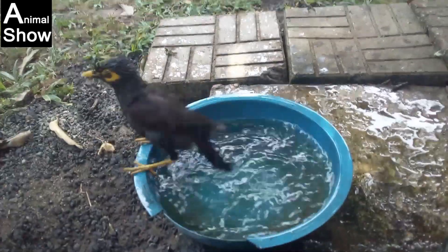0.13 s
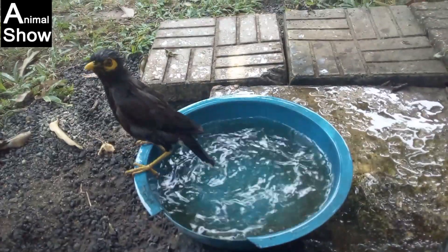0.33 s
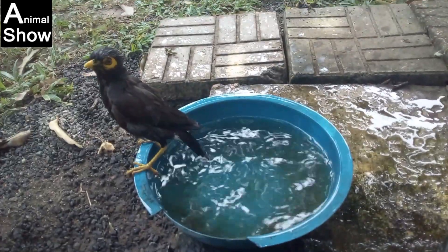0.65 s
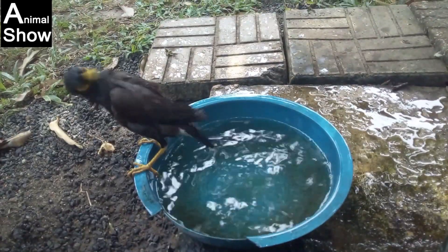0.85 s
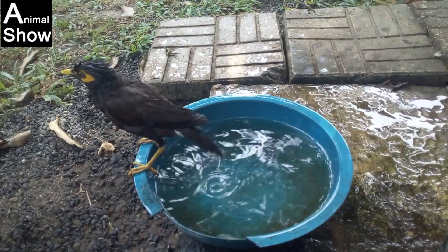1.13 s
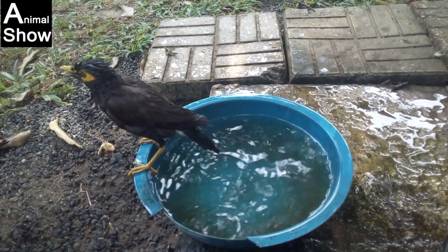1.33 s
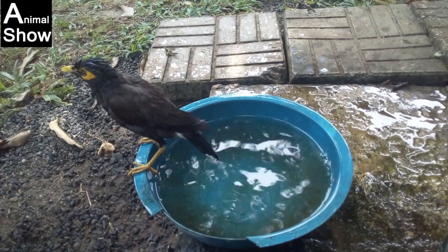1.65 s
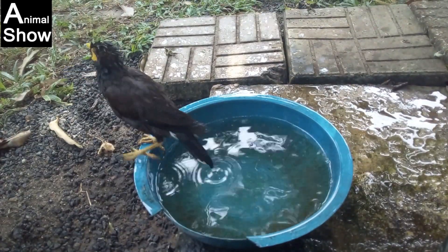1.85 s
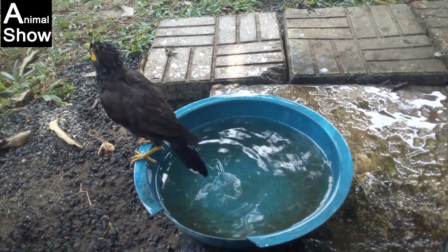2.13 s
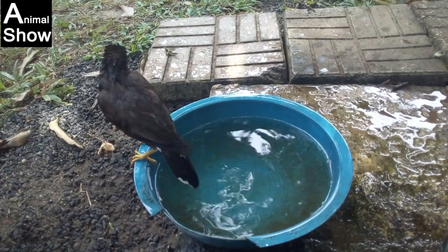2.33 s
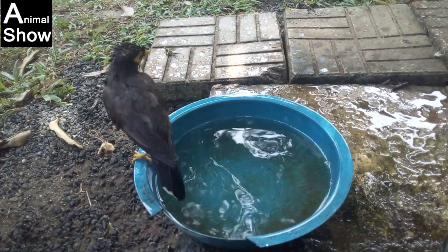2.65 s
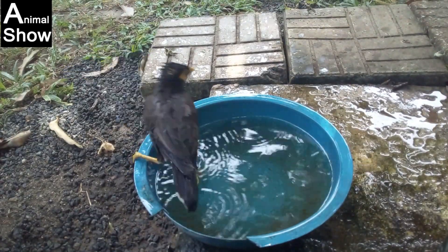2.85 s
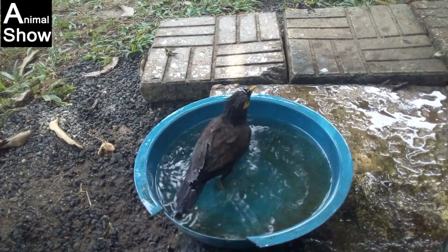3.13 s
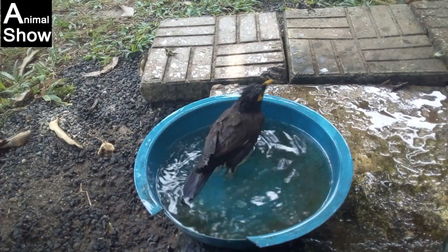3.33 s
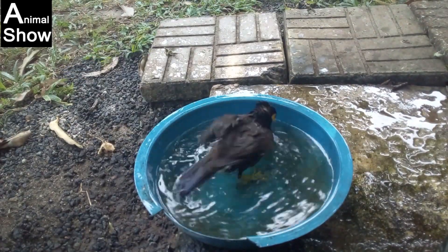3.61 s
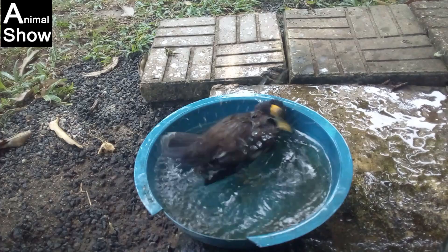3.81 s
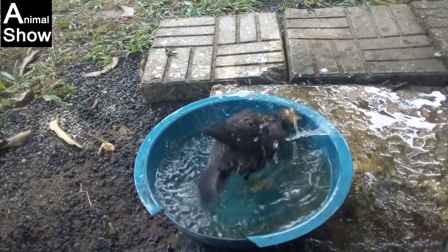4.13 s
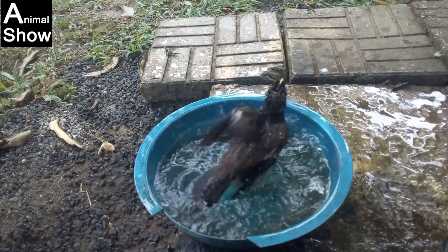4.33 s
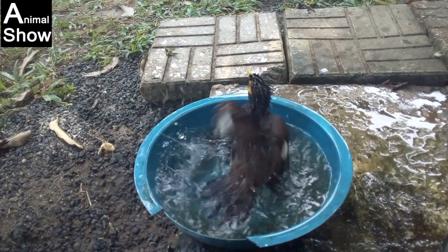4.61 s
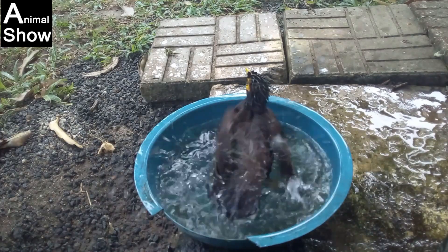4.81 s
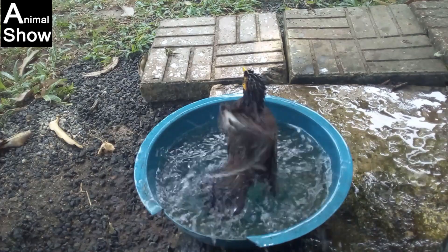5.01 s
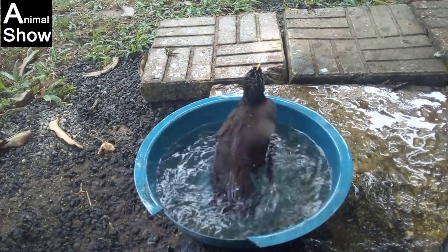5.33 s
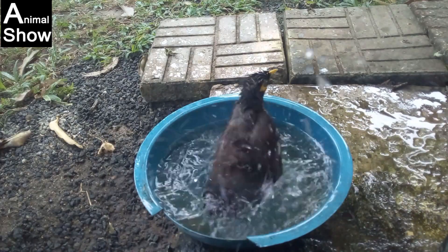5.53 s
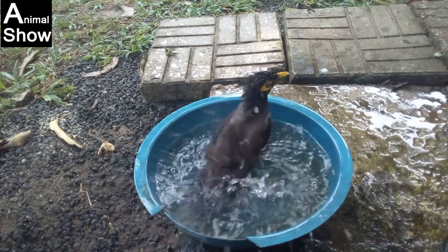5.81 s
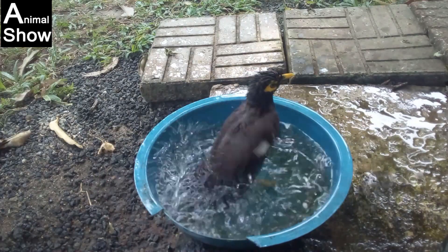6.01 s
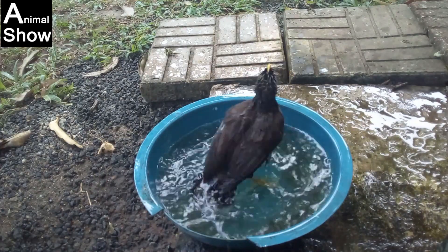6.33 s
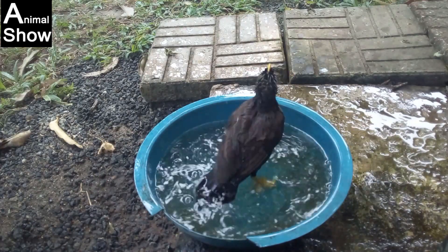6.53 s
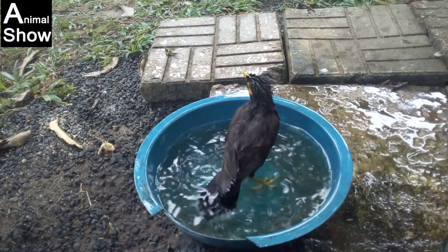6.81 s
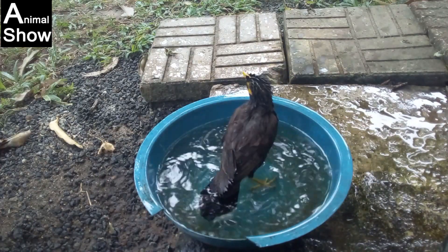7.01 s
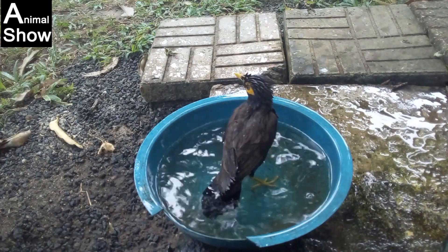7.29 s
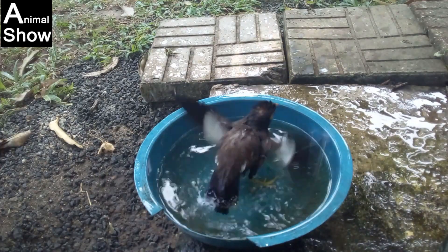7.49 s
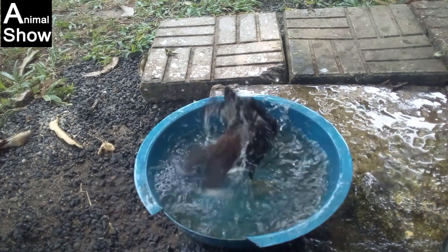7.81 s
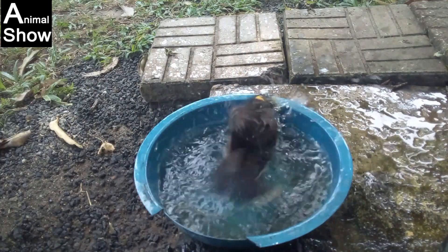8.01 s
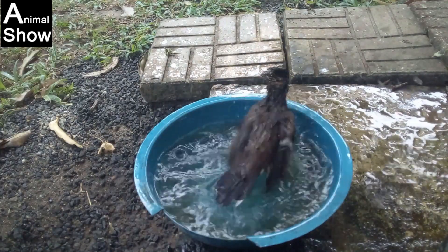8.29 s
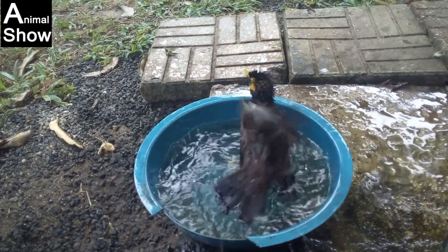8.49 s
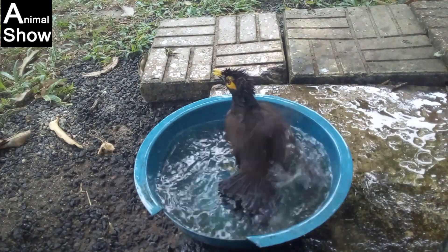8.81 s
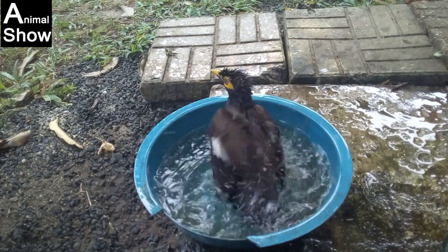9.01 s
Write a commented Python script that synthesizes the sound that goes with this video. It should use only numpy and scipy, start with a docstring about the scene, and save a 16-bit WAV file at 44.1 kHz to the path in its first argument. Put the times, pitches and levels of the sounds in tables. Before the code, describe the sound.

Outdoors in a quiet garden, heard close: a mynah-like bird gives one harsh squawk beside a basin of settling water. Near-silence, then little drips and foot plops, and a dull plastic tap. Wings beat the water about thirteen times a second, crisp and splashy, with popping bubbles. A pause holds a faint distant bird whistle, then sharp basin knocks and another whirring run of slaps that lasts to the end.

```python
"""A bird squawks on the rim of a plastic basin, hops in and beats its wings in the water, thirteen times a second.
Slaps are shaped noise bursts with a crack at the peak; some blows ring the basin wall as decaying modes.
Stirred water is a shower of short plinks over a wash; drops are ticks, bubbles are sines that climb in pitch.
The squawk sums wavering partials and rasping air; a small bird far off whistles falling notes.
Filtered noise makes far traffic, hiss and insects; sparse echoes surround the basin and both birds."""
import sys
import numpy as np
from scipy import signal
from scipy.fft import rfft, irfft
from scipy.io import wavfile
from scipy.ndimage import uniform_filter1d

SR = 44100
rng = np.random.default_rng(int(sys.argv[2]) if len(sys.argv) > 2 else 0)


def generate_wav(sig):
    """Save sig (samples, or channels by samples) to the path in sys.argv[1] as 16-bit PCM at SR."""
    pcm = np.round(np.clip(np.atleast_2d(sig).T, -1, 1) * 32767).astype(np.int16)
    wavfile.write(sys.argv[1], SR, pcm)


N = 403515

# Wing and foot slaps, before band gains. Each row: centre in seconds, crackle level in dB,
# low body in dB over the crackle, spray in dB over the crackle.
SLAPS = [(2.876, -57.5, 12.5, -13), (3.04, -58.5, 9.5, -10), (3.105, -46, 3.5, 4.5), (3.2424, -40, 0, 2.5),
         (4.2642, -43.5, -2, 7.5), (4.4512, -40.5, -9, -15), (4.5172, -40, 2, -19), (4.605, -32.5, -8, -15),
         (4.6807, -28, -6, -7), (4.7565, -29, -4, -8), (4.8315, -27.5, -2.5, -0.5),
         (4.908, -29.5, -9, -7.5), (4.9803, -30.5, -1.5, -3), (5.0576, -28, -9, 5.5),
         (5.1396, -31.5, -4.5, -2.5), (5.2155, -31, -11, -4.5), (5.2939, -28.5, -1, -6),
         (5.3832, -33.5, -4, -10.5), (5.4706, -28.5, -5.5, -7.5), (5.5416, -22, -12.5, -8.5),
         (5.6155, -22.5, -9, -10), (5.6878, -24, -8.5, -10), (5.7637, -22.5, -13.5, -9.5),
         (5.839, -24, -14, -4.5), (5.9171, -25, -10.5, -11), (5.9965, -28, -5, -7),
         (6.0796, -30, -1.5, -7.5), (6.1762, -40, -5, -3), (6.2758, -39, -4, -1.5), (7.7746, -45, -16, -21),
         (7.9458, -36.5, -8.5, -8), (8.0485, -34.5, 14, -0.5), (8.097, -37, -21, 7.5),
         (8.1445, -43, -14, -8), (8.2543, -48.5, 7.5, 4), (8.2935, -44, -2, 6.5), (8.3628, -47, 5, 3),
         (8.4562, -42, 1.5, -9), (8.5289, -32.5, -3, -4.5), (8.6054, -28, -3, -7.5),
         (8.682, -25.5, -8.5, -8), (8.7607, -27.5, -1, -9), (8.7886, -50.5, 13.5, -12),
         (8.839, -28, 1.5, -11.5), (8.9213, -29, -4.5, -14.5), (9.0028, -27.5, -2.5, -2),
         (9.081, -27, -7.5, -10.5)]
# Stirred water, one list per bout of movement. Each row: time in seconds, level in dB.
CHURN = [
    [(0, -49.5), (.17, -50), (.32, -53)],
    [(2.78, -58), (2.88, -58), (2.95, -64), (3.05, -58), (3.18, -62), (3.28, -48)],
    [(3.85, -55), (4.1, -54.5), (4.6, -54), (4.9, -50), (5.35, -57), (5.75, -51), (6.1, -51.5), (6.55, -66)],
    [(7.64, -59.5), (7.82, -54.5), (8.9, -53), (9.15, -55.5)],
]


def gain_of(db):
    """Decibels to amplitude."""
    return 10 ** (np.asarray(db) / 20)


def evened(x):
    """Scales to rms 1."""
    return x / np.sqrt(np.mean(x ** 2) + 1e-20)


def add(mix, start_s, sound):
    """Lays a sound into the mix at start_s, cut at the end of the mix."""
    part = mix[round(start_s * SR):][:len(sound)]
    part += sound[:len(part)]


def band(x, lo_hz, hi_hz, order=2):
    """Causal Butterworth band-pass."""
    edges_hz = [lo_hz, min(hi_hz, .45 * SR)]
    return signal.sosfilt(signal.butter(order, edges_hz, "band", fs=SR, output="sos"), x)


def coloured(x, points):
    """Filters x by a response given as (Hz, dB) points, joined on a log-frequency axis."""
    point_hz, point_db = np.transpose(points)
    hz = np.fft.rfftfreq(len(x), 1 / SR)
    response_db = np.interp(np.log(hz + 1), np.log(point_hz), point_db)
    return irfft(rfft(x) * gain_of(response_db), len(x))


def drift(count, size):
    """Smooth chance of rms 1 that changes over size samples."""
    once = uniform_filter1d(rng.standard_normal(count), size)
    return evened(uniform_filter1d(once, size))


def sampled(rows):
    """Start time and the columns of a curve, sample by sample."""
    row_s, *columns = np.transpose(rows)
    t = np.arange(row_s[0], row_s[-1], 1 / SR)
    return row_s[0], [np.interp(t, row_s, column) for column in columns]


def tone(hz, rough, partials):
    """Partials on a wavering pitch with a fluttering level."""
    turns = np.cumsum(hz * (1 + 0.051 * rough * drift(len(hz), size=90))) / SR
    flutter = gain_of(7.3 * rough * drift(len(hz), size=120))
    waves = sum(gain_of(db) * np.sin(2 * np.pi * multiple * turns) for multiple, db in partials)
    return flutter * np.sqrt(2) * waves


def garden(hiss_db=-55):
    """Noise bands: traffic rumble that swells, steady hiss, insects and a faint distant drone."""
    # Spectrum. Each row: frequency in Hz, relative density in dB per Hz.
    spectrum = [(20, -30), (36, -5.5), (62, 5.5), (100, 2), (150, -1.5), (300, -9.5), (500, -17),
                (1200, -22), (3000, -27), (4900, -30.5), (8600, -39), (15300, -37), (16000, -38)]
    # Traffic swell, before a 3 dB lift. Each row: time in seconds, level in dB.
    swell = [(0.0, -46.5), (0.46, -57), (6.04, -52.5), (6.88, -56.5), (8.97, -54), (9.15, -54.5)]
    # Insect bands. Each row: centre in Hz, width in Hz, mean level in dB.
    insect_bands = [(5680, 230, -67.5), (6030, 140, -73), (6570, 200, -71), (7000, 280, -74),
                    (6400, 2700, -67)]
    # Distant band: centre in Hz, width in Hz, mean level in dB.
    drone = (780, 150, -71)
    noise = coloured(rng.standard_normal(N), spectrum)
    swell_s, swell_db = np.transpose(swell)
    rumble_db = np.interp(np.arange(N) / SR, swell_s, swell_db) + 3.0
    rumble = gain_of(rumble_db) * evened(band(noise, 18, 265))
    hiss = gain_of(hiss_db + .5 * drift(N, size=4000)) * evened(band(noise, 203, 13100))
    insects = np.zeros(N)
    for hz, width_hz, db in insect_bands + [drone]:
        buzz = evened(band(rng.standard_normal(N), hz - width_hz / 2, hz + width_hz / 2))
        insects += gain_of(db + 1.3 * drift(N, size=300)) * buzz
    return rumble + hiss + insects


def squawk(rough=.33, rasp_db=-10):
    """Two membranes sound in the first note, with sum and difference tones; air rasps past them."""
    # Main voice, one list per note. Each row: time in seconds, pitch in Hz, level in dB.
    notes = [
        [(0, 1820, -36.5), (.02, 1902, -49), (.045, 2140, -44), (.07, 2317, -32.5), (.092, 2146, -37),
         (.106, 2040, -38), (.13, 2030, -46)],
        [(.13, 1520, -41), (.152, 1686, -33), (.172, 1700, -33.5), (.183, 1640, -37), (.198, 1850, -36),
         (.225, 1903, -41.5), (.25, 2070, -50), (.28, 1940, -60)],
    ]
    # Each row: multiple of the pitch, relative level in dB.
    overtones = [(1, 0), (2, -7), (3, -11), (4, -15)]
    # Second membrane. Each row: time in seconds, pitch in Hz, level in dB before partial gains.
    second_voice = [(.045, 1133, -68), (.068, 1316, -48), (.095, 1246, -53), (.125, 1260, -57)]
    main, second = np.zeros((2, N))
    start_s, (hz, db) = sampled(second_voice)
    add(second, start_s, gain_of(db) * tone(hz, 0.27, [(1, 2.6), (2, 5.7)]))
    for rows in notes:
        start_s, (hz, db) = sampled(rows)
        voice = tone(hz, rough, overtones)
        air = evened(band(rng.standard_normal(len(hz)), 1200, 7500))
        rasp = gain_of(rasp_db) * air * gain_of(4 * drift(len(hz), size=150))
        add(main, start_s, gain_of(db) * (voice + rasp) * signal.windows.tukey(len(hz), .1))
    combination = gain_of(30) * main * second
    return band(main + second + combination, 480, 6600, order=3)  # the beak passes little above this


def stirred():
    """Level of the moving water, sample by sample."""
    level = np.zeros(N)
    for rows in CHURN:
        start_s, (db,) = sampled(rows)
        add(level, start_s, gain_of(db) * signal.windows.tukey(len(db), .06))
    return level


def bubble(db, hz, t60_s, rise=9.5):
    """A pocket of air rings and climbs in pitch as it nears the surface."""
    t = np.arange(SR // 25) / SR
    decay = gain_of(db - 60 * t / max(t60_s, .005))
    onset = 1 - np.exp(-t / 0.0004)
    return decay * onset * np.sin(2 * np.pi * hz * (t + rise * t ** 2))


def gurgle(per_s=90):
    """Small bubbles of chance pitch burst now and then in the stirred water."""
    out = np.zeros(N)
    for when, pitch, size in rng.random((round(per_s * N / SR), 3)):
        add(out, when * N / SR, bubble(14 * size, 1000 * 4.5 ** pitch ** 1.5, 0.022))
    return evened(out)


def churn(per_s=1700.0, spread_db=2.5, clump_db=3.5, wash_db=-9, gurgle_db=-10.5):
    """Falling droplets of many pitches, in clumps, over a patchy wash with gurgling bubbles."""
    # Water spectrum. Each row: frequency in Hz, relative density in dB per Hz.
    fizz = [(180, 7), (300, 12.5), (1770, -0.5), (5930, -6.5), (8870, -12.5), (13500, -11.5), (15700, -10),
            (16500, -49)]
    size = gain_of(spread_db * np.minimum(rng.exponential(1, N), 4))
    hits = size * (rng.random(N) < per_s / SR)
    kind, fall = rng.integers(0, 24, N), np.zeros(N)
    for k, hz in enumerate(np.geomspace(900, 15000, 24)):
        u = np.arange(0, 14, hz / SR)  # time in cycles
        # low drops trap air and ring longer
        cycles = np.clip(rng.uniform(0.39, 0.4) * (2600 / hz) ** 0.27, .35, 2.2)
        plink = u * np.exp(-u / cycles) * np.sin(2 * np.pi * (u + 0.047 * u ** 2))
        fall += signal.oaconvolve(hits * (kind == k), plink / np.linalg.norm(plink))[:N]
    white = coloured(fall, [(500, -10), (14000, 14.0)])  # log-spread pitches crowd the low end
    wash = gain_of(wash_db) * rng.standard_normal(N)
    water = coloured(evened(white) + wash, fizz)
    slop = band(water, 170, 7300)  # heavy water and fine spray clump apart
    heavy = gain_of(clump_db * drift(N, size=900)) * slop
    fine = gain_of(clump_db * drift(N, size=600)) * (water - slop)
    return stirred() * (evened(heavy + fine) + gain_of(gurgle_db) * gurgle())


def wing_tips(lead_s=.011, scatter_s=.002, over_slap_db=-8, centre_hz=4300, from_db=-36, until_s=8.65):
    """The wing tip ticks just before each full beat, until the bird stands tall."""
    late, size, pitch = rng.standard_normal((len(SLAPS), 3)).T
    slap_s, slap_db = np.transpose(SLAPS)[:2]
    tick_s = slap_s - lead_s + scatter_s * late
    tick_db = slap_db + over_slap_db + 3 * size
    full_beat = (slap_db > from_db) & (slap_s < until_s)
    return np.c_[tick_s, tick_db, centre_hz * 1.35 ** pitch][full_beat]


def drips(per_s=16, over_water_db=7.5, spread_db=4):
    """Chance drops whose level follows the stirred water, from the second bout on."""
    when, size, pitch = rng.random((round(per_s * N / SR), 3)).T
    water_db = 20 * np.log10(stirred()[(when * N).astype(int)] + 1e-9)
    drip_db = water_db + over_water_db - spread_db * np.log(size + .02)
    rows = np.c_[when * N / SR, drip_db, 2500 * 3.6 ** pitch]
    return rows[rows[:, 0] > CHURN[1][0][0]]


def drops(t60_s=0.013):
    """Each drop, wing-tip tick or drip is a decaying noise tick, wide around its own centre."""
    # Clearest drops and ticks. Each row: time in seconds, level in dB before a 6 dB lift, centre in Hz.
    clear_drops = [(0.055, -54, 11000), (0.225, -32.5, 3860), (0.2518, -40, 1980), (0.2847, -36.5, 5640),
                   (1.0356, -47, 4110), (2.8139, -42.5, 3280), (2.829, -40, 2910), (2.8373, -40, 4100),
                   (2.8556, -43, 2900), (2.976, -45.5, 2000), (3.0268, -46, 1670), (3.0613, -46.5, 1820),
                   (3.116, -37.5, 2680), (3.149, -46, 3390), (3.1973, -45, 4150), (3.2153, -35, 2520),
                   (3.2231, -33, 3540), (3.3477, -43, 2820), (3.4339, -43.5, 2730), (3.444, -40.5, 4430),
                   (3.587, -47, 4030), (3.9823, -37.5, 2850), (4.0551, -45, 3160), (4.132, -45, 1800),
                   (4.167, -40, 3320), (4.239, -38, 4600), (4.28, -41, 7220), (4.353, -41.5, 5940),
                   (4.4277, -42, 7530), (4.5274, -33, 8520), (4.6893, -43, 2150), (5.222, -37, 3210),
                   (5.392, -34.5, 5560), (5.9092, -23.5, 4370), (6.24, -41, 3140), (6.5793, -45, 5100),
                   (7.677, -43, 8560), (7.799, -35, 5960), (7.9238, -38.5, 6000), (7.9333, -40, 4280),
                   (8.1346, -38.5, 4680), (8.2692, -40, 2920), (8.328, -39, 3510), (8.3349, -36, 2680),
                   (8.3825, -42.5, 4170), (8.467, -35, 5100), (8.5912, -33, 5490), (8.6137, -36, 5090),
                   (9.009, -34, 3500)]
    out, t = np.zeros(N), np.arange(SR // 50) / SR
    for tick_s, db, hz in np.r_[clear_drops, wing_tips(), drips()]:
        tick = band(rng.standard_normal(len(t)) * gain_of(-60 * t / t60_s), hz / 2.46, hz * 1.47)
        add(out, max(tick_s - .0006, 0), gain_of(db + 6.0) * tick / abs(tick).max())
    return out


def bubbles(count=3, after_s=.05, after_db=-9, t60_s=0.018, violent_db=-28, shorter_by_level=0.43):
    """Clear bubbles, and small ones popping after each slap; violent bubbles burst sooner."""
    # Trapped air. Each row: time in seconds, level in dB, starting pitch in Hz.
    clear_bubbles = [(.214, -37, 840), (4.5152, -15.5, 1400), (4.678, -24, 1670), (4.845, -20, 2070),
                     (4.853, -30, 1150), (4.948, -32, 1370), (5.2929, -21.5, 1010), (5.5633, -36, 4030),
                     (5.829, -25.5, 1150), (5.874, -25, 1530), (5.929, -34, 1100), (5.947, -35, 1300),
                     (6.077, -21, 1970), (8.141, -34, 3820), (8.6043, -12, 4200), (8.758, -26, 1190),
                     (8.82, -33, 1700), (8.834, -28, 1300), (8.8388, -30, 1670), (8.872, -33, 2500),
                     (8.9183, -23, 1840)]
    when, size, pitch = rng.random((len(SLAPS), count, 3)).T
    slap_s, slap_db = np.transpose(SLAPS)[:2]
    pop_s = slap_s + .006 + after_s * when
    pop_db = slap_db + after_db - 14 * size
    small = np.c_[pop_s.ravel(), pop_db.ravel(), (1000 * 4.2 ** pitch).ravel()]
    out = np.zeros(N)
    for start_s, db, hz in np.r_[clear_bubbles, small]:
        shorter_db = shorter_by_level * min(violent_db - db, 0)  # dB of ring time
        add(out, start_s, bubble(db, hz, t60_s * gain_of(shorter_db)))
    return out


def slap_shape(t, spread_s, rise_share=.75, fall_share=1.7, tail_db=-13.5, tail_t60_s=0.096):
    """A slap rises faster than it falls and leaves a tail of falling spray."""
    from_peak = t + (1 - rise_share) * spread_s
    rise = np.exp(-.5 * (from_peak / (rise_share * spread_s)) ** 2)
    fall = np.exp(-abs(from_peak / (fall_share * spread_s)) ** 1.45)
    tail = gain_of(tail_db - 60 * t / tail_t60_s) * (t > 0)
    return np.where(from_peak < 0, rise, fall) + tail


def slaps(spread_db=6.0, push_db=-20.0, crack_db=14):
    """A cluster of tiny impacts swells and thins out, peaks in a sharp crack and shoves the water."""
    base_spread_s, hard_db = 0.0014, -30
    shorter_by_force, shorter_by_spray = 0.22, 0.39  # hard, bright slaps are briefer: dB of length per dB
    t = np.arange(SR // 8) / SR - .012
    push, body, crackle, spray = np.zeros((4, N))
    for s, db, body_db, spray_db in SLAPS:
        length_db = shorter_by_force * (hard_db - db) - shorter_by_spray * spray_db
        shape = slap_shape(t, base_spread_s * gain_of(length_db))
        layers = ((body, db + body_db), (crackle, db), (spray, db + spray_db), (push, db + push_db))
        for mix, level_db in layers:
            noise, size = rng.standard_normal((2, len(t)))
            droplets = gain_of(spread_db * np.repeat(size, 24)[:len(t)])  # half a millisecond each
            burst = shape * noise * droplets
            add(mix, s + t[0], gain_of(level_db) * burst * np.linalg.norm(shape) / np.linalg.norm(burst))
        chance_db = 3 * rng.standard_normal()
        for mix, level_db in ((crackle, db), (spray, db + spray_db)):
            crack = gain_of(level_db + crack_db + chance_db) * np.array([1., -1])
            add(mix, s + t[np.argmax(shape)], crack)
    low = gain_of(20) * band(push, 106, 444) + gain_of(10) * band(body, 820, 2600, order=4)
    return low + gain_of(5.5) * band(crackle, 2880, 6920) + band(spray, 6900, 15300)


def whistles(edge_db=-16, rough=.16):
    """Thin notes of a small far bird hold, then glide down, swelling in the middle."""
    # Each row: start in seconds, length in seconds, first and last pitch in Hz before a 2 % lowering,
    # level in dB, share of the note held before the fall.
    notes = [(3.14, .2, 5900, 3980, -58, .2), (7.012, 0.15, 4810, 4100, -56.5, 0.52),
             (7.195, 0.037, 4300, 4130, -59, .4)]
    out = np.zeros(N)
    for start_s, length_s, first_hz, last_hz, db, held in notes:
        u = np.arange(0, 1, 1 / (length_s * SR))
        hz = np.interp(u, [0, np.clip(held, .01, .95), 1], [first_hz, first_hz, last_hz])
        swell = gain_of(db + edge_db * (2 * u - 1) ** 4)
        add(out, start_s, swell * tone(hz, rough, [(0.98, 0)]))
    return out


def ringing(t, modes, extra_db):
    """Sum of decaying sine modes, each with its own extra level in dB."""
    return sum(gain_of(db + extra - 60 * t / t60_s) * np.sin(2 * np.pi * hz * t)
               for (hz, db, t60_s), extra in zip(modes, extra_db))


def knocks():
    """Each blow rings the wall; where it lands decides how strongly each mode answers."""
    # Blows of foot or wing. Each row: time in seconds, level in dB, low ring of the full basin in dB,
    # tilt of the wall modes in dB per octave.
    blows = [(3.2422, -10.5, -22.5, 7), (8.0465, -6.5, -50, 9), (8.049, -19, -34, -3),
             (8.0973, -7.5, -44, -3.5), (8.2915, -17, -32, 3)]
    # Wall modes. Each row: frequency in Hz, relative level in dB, t60 in seconds.
    wall_modes = [(865, 12, 0.03), (1040, 9, 0.017), (1300, 2, 0.013), (1840, 7.5, 0.012), (2260, 0, 0.017),
                  (2730, -14.5, 0.027), (3560, -16, 0.026), (3820, -38, .016)]
    # Low modes of the full basin. Each row: frequency in Hz, relative level in dB, t60 in seconds.
    low_modes = [(277, -5.5, 0.08), (467, 2.5, 0.08)]
    out, t = np.zeros(N), np.arange(SR // 8) / SR
    octaves = np.log2(np.transpose(wall_modes)[0] / wall_modes[3][0])
    for blow_s, db, low_db, tilt_db in blows:
        spot_db = rng.standard_normal(len(wall_modes)) + tilt_db * octaves
        ring = ringing(t, wall_modes, spot_db)
        wall = band(ring / abs(ring).max(), 1164, 6300, order=3)
        low = ringing(t, low_modes, [low_db] * len(low_modes)) * (1 - np.exp(-t / 0.0027))
        add(out, blow_s, gain_of(db) * (wall + low))
    return out


def yard(x, t60_s=.4):
    """Sparse decaying echoes from walls and paving."""
    t = np.arange(SR // 2) / SR
    signs = rng.choice([-1., 0, 1.], len(t), p=[.025, .95, .025])
    taps = signs * gain_of(-60 * t / t60_s) * (t > .004)
    return signal.oaconvolve(band(x, 400, 7000, order=1), taps / np.linalg.norm(taps))[:N]


def scene():
    """The basin close by, the garden around it."""
    near = slaps() + drops() + knocks() + churn() + bubbles()
    call, far = squawk(), whistles()
    echoes = yard(gain_of(-26) * near + gain_of(-16) * call + gain_of(-3) * far)
    return (near + call + far + echoes + garden())[None]


def record(dry, edge_hz=16300):
    """Linear-phase low-pass."""
    low_pass = signal.firwin(511, edge_hz, window=("kaiser", 9), fs=SR)
    return signal.oaconvolve(dry, low_pass[None], "same")


dry = scene()
out = record(dry)
generate_wav(out)
```